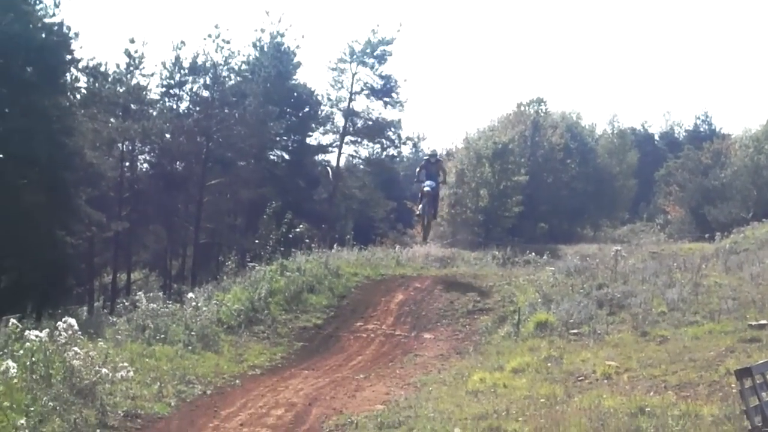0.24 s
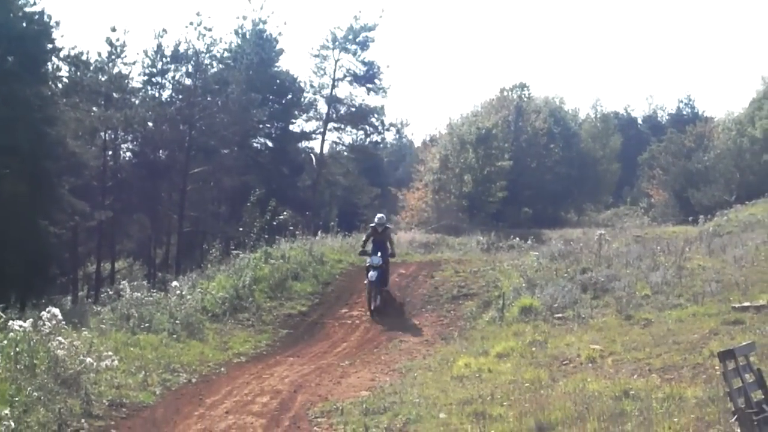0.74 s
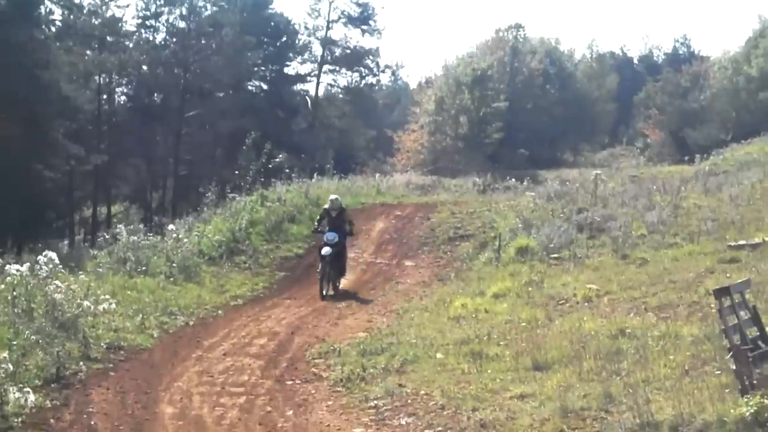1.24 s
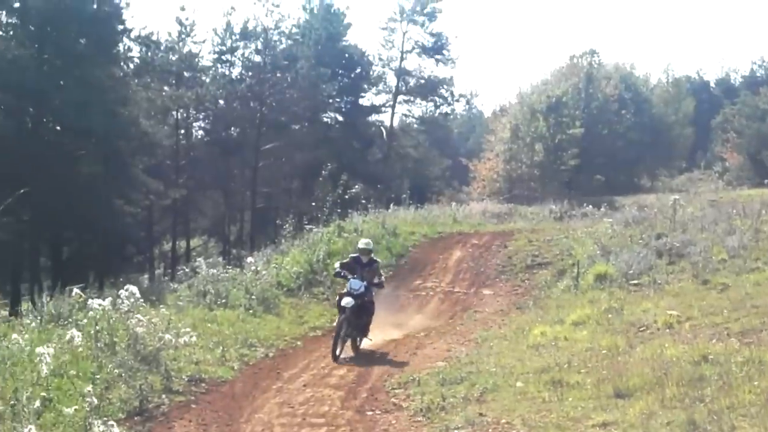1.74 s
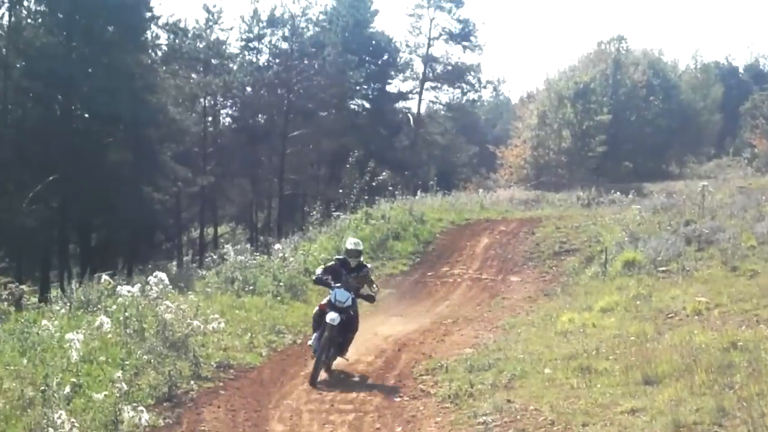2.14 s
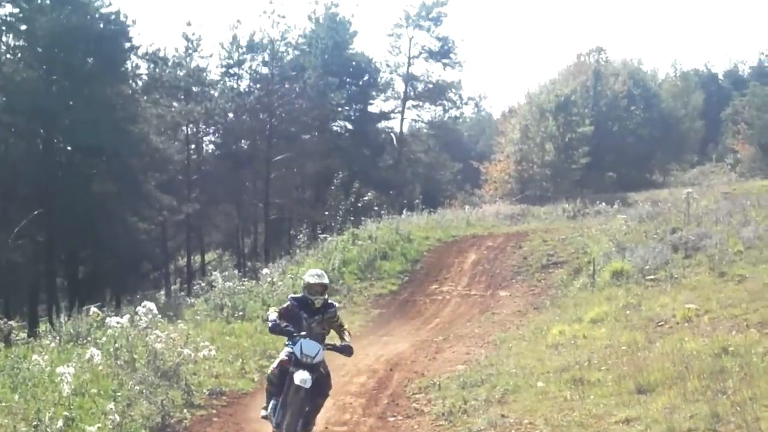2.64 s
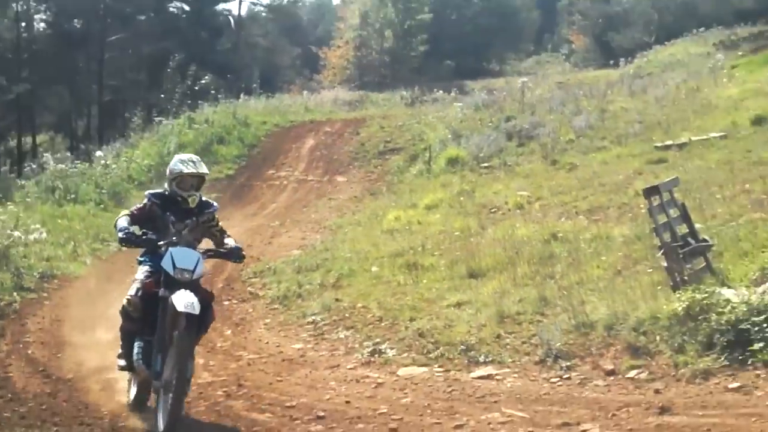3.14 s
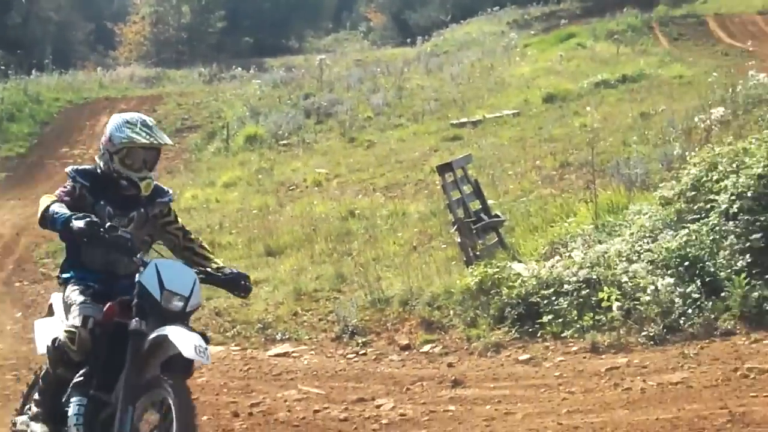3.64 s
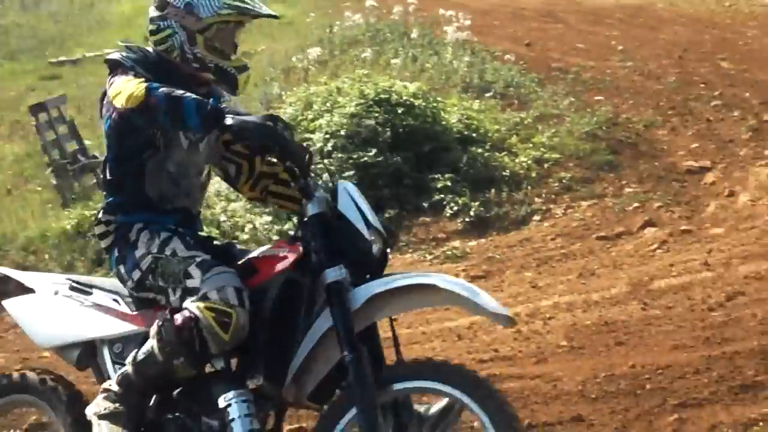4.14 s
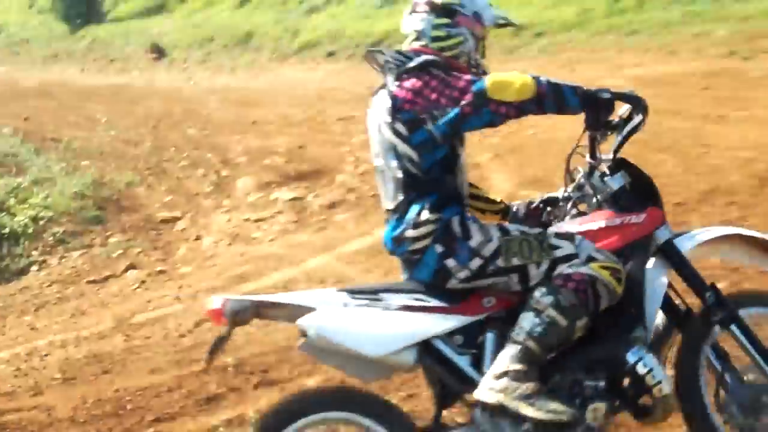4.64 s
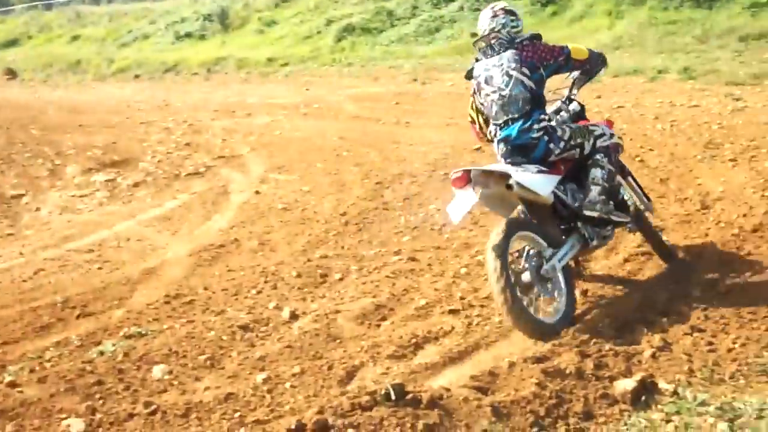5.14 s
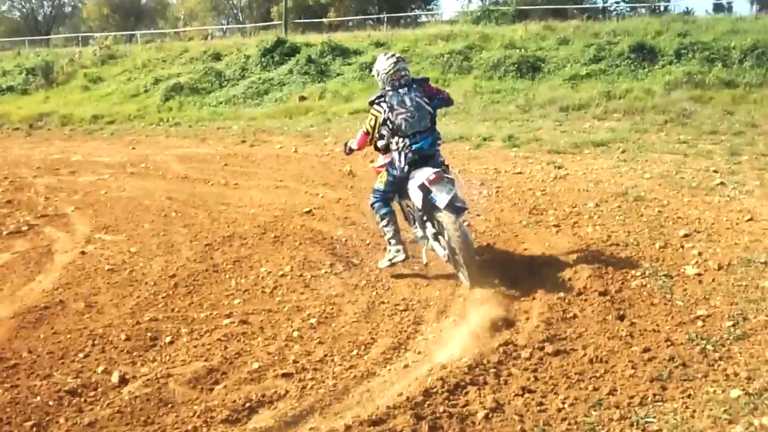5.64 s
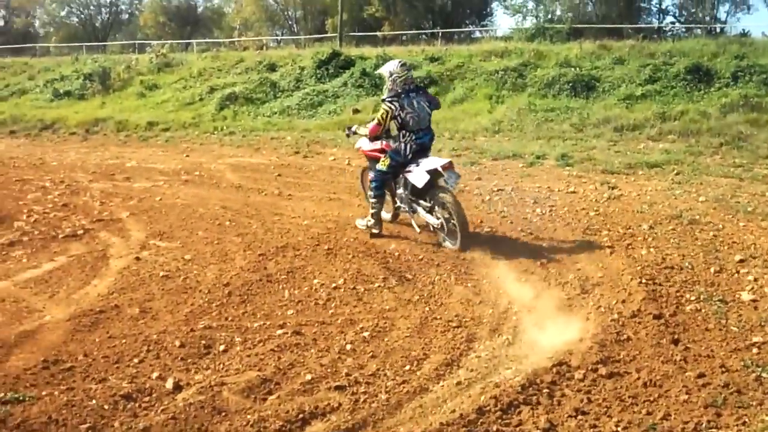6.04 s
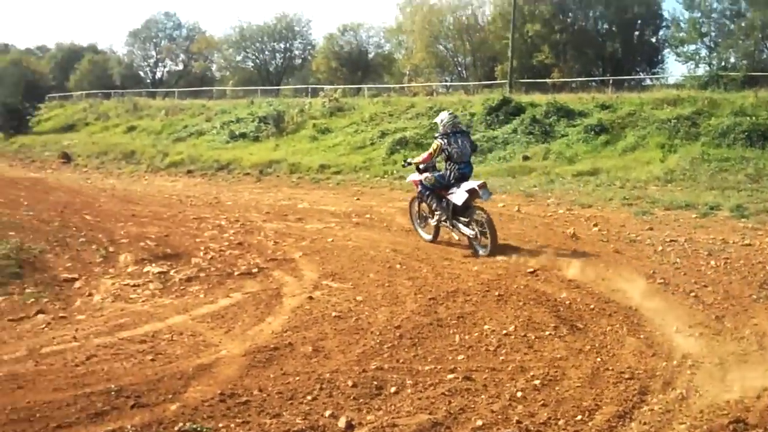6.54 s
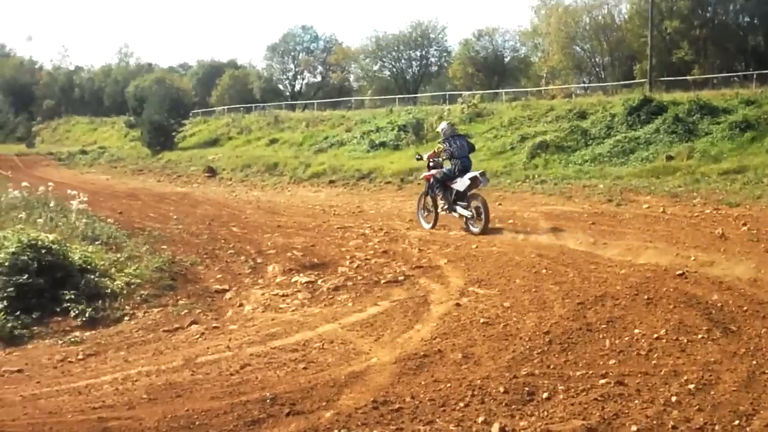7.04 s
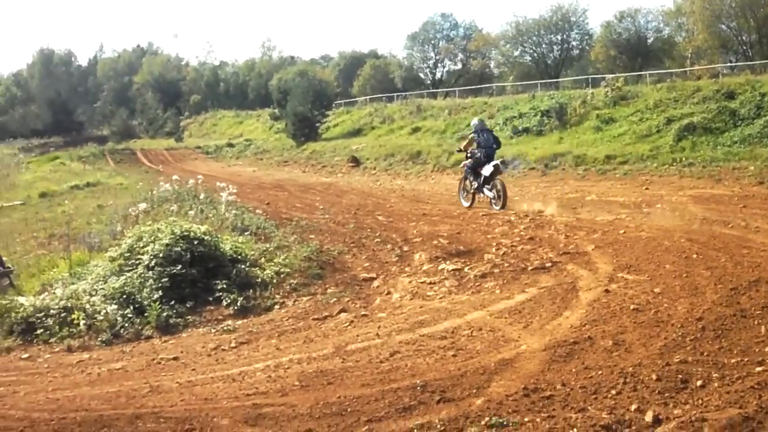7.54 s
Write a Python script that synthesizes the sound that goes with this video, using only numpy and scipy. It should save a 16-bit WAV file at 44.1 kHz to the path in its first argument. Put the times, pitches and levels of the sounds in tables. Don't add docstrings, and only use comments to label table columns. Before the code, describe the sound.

Close trackside microphone, light wind rumble. A hidden bike burbles low while a dirt bike rattles in over a jump, jolts down and buzzes sharply for a moment. The throttle closes; tyres, fins and chain whirr grow nearer. The sound cuts to dead silence, snaps back with a tiny splutter, and the two-stroke accelerates away with hard, hollow, wavering revs, a brief lift and a last popping burst.

```python
import sys
import numpy as np
from scipy import signal
from scipy.fft import rfft, irfft
from scipy.io import wavfile

SR = 44100
rng = np.random.default_rng(int(sys.argv[2]) if len(sys.argv) > 2 else 0)


def dump(signal):
    limited = np.clip(np.atleast_2d(signal).T, -1, 1)
    pcm = np.round(limited * 32767).astype(np.int16)
    wavfile.write(sys.argv[1], SR, pcm)


def gain_from_db(level_db):
    decades = np.asarray(level_db, float) / 20
    return 10 ** decades


N = 343978


def rms_one(x):
    return x / np.sqrt(np.mean(x ** 2) + 1e-20)


def in_time(rows):
    s, *columns = np.transpose(rows)
    return [np.interp(np.arange(N) / SR, s, column) for column in columns]


def drift(rate):
    steps = rng.standard_normal(800)
    return np.interp(np.arange(N) / SR * rate, np.arange(800), steps) * 0.923


def coloured(spectrum):
    hz, level_db = np.transpose(spectrum)
    grid = np.arange(1, N // 2 + 2) * SR / N
    shape = gain_from_db(np.interp(np.log(grid), np.log(hz), level_db, left=-90, right=-90))
    return rms_one(irfft(rfft(rng.standard_normal(N)) * shape, N))


def strikes(rows):
    clicks = np.zeros(N) + 1e-18
    clicks[[round(s * SR) for s, level_db in rows]] = gain_from_db(np.array(rows)[:, 1])
    return clicks


def late(x, lag_ms):
    return np.interp(np.arange(N) - lag_ms * SR / 1000, np.arange(N), x)


def band(x, order, band_hz):
    return signal.sosfilt(signal.butter(order, band_hz, "band", fs=SR, output="sos"), x)


def dull(x, order, cutoff_hz):
    return signal.sosfilt(signal.butter(order, cutoff_hz, fs=SR, output="sos"), x)


def pipe(x, modes):
    out = 0
    for k, (hz, width, level_db) in enumerate(modes):
        r = np.exp(-np.pi * width / SR)
        poles = [1, -2 * r * np.cos(2 * np.pi * hz / SR), r * r]
        out = out + (-1) ** k * gain_from_db(level_db) * signal.lfilter([1 - r, 0, r - 1], poles, x)
    return out


def sliding(x, hz, width_hz):
    turn = np.exp(2j * np.pi * np.cumsum(hz) / SR)
    r = np.exp(-np.pi * width_hz / SR)
    return 2 * np.real(turn * signal.lfilter([1 - r], [1, -r], x / turn))


VOICE_PATCHY_DB = 1.2


def engine(controls, voices, lag_ms):
    rate, orders_db, voices_db, spread_db = controls
    turns = np.cumsum(rate * (1 + .003 * drift(14) + .001 * spread_db * drift(40))) / SR
    cycle = turns.astype(int)
    strength = gain_from_db(np.minimum(spread_db, 2) * rng.standard_normal(1200)[cycle])
    sound = 0
    for k, level_db in enumerate(orders_db, 1):
        phase = 2 * np.pi * k * (turns - .06 - rate * lag_ms / 1000) + .3
        sound = sound + np.sqrt(2) * gain_from_db(level_db + .5 * spread_db * drift(25)) * np.sin(phase)
    gate = np.exp(-5.0 * (turns - cycle)) * strength
    pulses = np.diff(cycle, prepend=0) * strength * np.sqrt(SR / rate)
    breath = .13 * spread_db ** 2
    puffs = breath * (gate + .4) * rng.standard_normal(N)
    source = (pulses + puffs) / np.sqrt(1 + .42 * breath ** 2)
    for level_db, (resonate, band_hz, lift_db, roar) in zip(voices_db, voices):
        ringing = band(resonate(source + roar * rng.standard_normal(N)), 3, band_hz)
        sound = sound + gain_from_db(level_db + lift_db + VOICE_PATCHY_DB * drift(11)) * rms_one(ringing)
    return sound, gate, turns


# start_s, level_db over the mean
GUSTS = [(0, -10), (1.7, 3.5), (2.2, -1), (5.6, 3), (6.1, 0), (7.8, 0.5)]
WIND_DB = -47.5


def wind():
    rumble = coloured([(12, -5.5), (28, -21.0), (70, -10.0), (120, -11.0)])
    return gain_from_db(WIND_DB + in_time(GUSTS)[0] + 4.5 * drift(30)) * rumble


# start_s, firings_per_s
HIDDEN_REVS = [(0, 42.6), (.5, 43.8), (.62, 48), (.69, 47), (.78, 50.5), (.99, 55.9), (1.05, 52.9),
               (1.39, 51), (1.67, 54.7), (1.77, 58.8), (1.84, 65.7), (1.93, 53.2), (2.05, 73.9),
               (2.26, 52.2), (2.33, 50.5), (3.1, 47.1), (3.4, 46), (3.75, 48.9), (4.18, 53.1), (4.3, 50.4),
               (4.56, 54.6)]
# start_s, level_db
HIDDEN_EFFORT = [(0, -4), (.5, 1.5), (.99, 10), (1.16, 10.5), (1.22, -7), (1.67, 6), (1.84, 12),
                 (1.93, -1.5), (1.97, 12), (2.05, 16.5), (2.17, 4), (2.33, -2), (3.1, -1.5), (3.4, 6),
                 (4.05, -7), (4.18, 1), (4.3, -16), (4.56, 9)]
# start_s, spread_db
HIDDEN_ROUGH = [(0, .35), (.5, .4), (.6, 1), (.93, 1.6), (1.1, 2.2), (2.3, 1.5), (4.56, 3)]
# idle_db, share_of_effort, overrun_lift_db
HIDDEN_ORDERS = [(-49.5, 0.82, 0.5), (-45, 0.94, 5.5), (-58.5, 0.065, 20.5), (-45.5, 0.33, -14),
                 (-43.5, 0.13, -6), (-50, 0.19, -17), (-64, 0.264, -20), (-69, 0.41, -10), (-53, .1, -8),
                 (-54.5, .1, -4)]
# idle_db, share_of_effort, overrun_lift_db
HIDDEN_VOICES = [
    (-46.5, 0.51, 1),
    (-59.5, 1, -1.3),
]
# start_s, end_s
OVERRUN_S = (2.164, 3.31)
OVERRUN_EASE_S = 0.28
LEAVES_S, LEAVING_DB_PER_S = 3.0, -28
HIDDEN_CRACK_S, HIDDEN_MUFFLED_DB = .565, -7


def hidden_controls():
    t = np.arange(N) / SR
    (effort_db,) = in_time(HIDDEN_EFFORT)
    inside_s = np.minimum(t - OVERRUN_S[0], OVERRUN_S[1] - t)
    overrun = np.clip(inside_s / OVERRUN_EASE_S + 1, 0, 1)
    *orders_db, pipe_db, tail_db = [idle_db + share * effort_db + lift_db * overrun
                                    for idle_db, share, lift_db in HIDDEN_ORDERS + HIDDEN_VOICES]
    leaving_db = LEAVING_DB_PER_S * np.maximum(t - LEAVES_S, 0)
    orders_db[3:] = [level_db + leaving_db for level_db in orders_db[3:]]
    tail_db = tail_db + HIDDEN_MUFFLED_DB * (t < HIDDEN_CRACK_S)
    return in_time(HIDDEN_REVS)[0], orders_db, [pipe_db + leaving_db, tail_db], in_time(HIDDEN_ROUGH)[0]


# teeth_per_turn, level_db
GEAR_MESH = [(27, -58), (42, -61), (44, -57)]


def gear_whine(turns):
    loaded = np.interp(np.arange(N) / SR, [2.2, 2.5, 3.0, 3.15], [0, 1, 1, 0])
    return loaded * sum(gain_from_db(level_db + 3 * drift(12)) * np.sin(2 * np.pi * teeth * turns)
                        for teeth, level_db in GEAR_MESH)


# start_s, level_db
CRACKS = [(.5987, -27.5), (.6192, -31.5), (.681, -31), (.7663, -30), (.901, -29), (.9893, -33),
          (1.0667, -31), (1.1031, -29.5), (1.1205, -28), (1.155, -28), (1.173, -28.5), (1.9677, -30),
          (1.9841, -30), (1.9996, -27), (2.0141, -27), (2.0415, -25), (2.0674, -25)]
# pitch_hz, width_hz, level_db
CRACK_RING = [(1750, 200, 5), (2470, 350, -0.5), (3300, 500, -3)]


def hidden_cracks():
    return gain_from_db(17) * pipe(strikes(CRACKS), CRACK_RING)


# pitch_hz, width_hz, level_db
HIDDEN_PIPE = [(204.4, 17, 12.5), (276, 25, 2), (430, 83, -7.5), (606, 510, -34)]
# pitch_hz, width_hz, level_db
HIDDEN_TAIL = [(1150, 200, -4), (1750, 170, 3), (2500, 300, -4), (3600, 600, -11)]


def hidden_bike():
    # resonances, band Hz, lift dB, share of steady gas roar
    voices = [(lambda x: pipe(x, HIDDEN_PIPE), [150, 900], 0, .04),
              (lambda x: pipe(x, HIDDEN_TAIL), [950, 4500], 4, .2)]
    sound, gate, turns = engine(hidden_controls(), voices, 0)
    heard = np.arange(N) < DROPOUT_S[1] * SR
    return sound * heard + gear_whine(turns) + hidden_cracks(), gate


# start_s, shut_s, first_load (0-1), last_load (0-1)
THROTTLE = [
    (1.063, 1.081, 0.5, 0.01),
    (1.239, 1.822, 0.7, 0.73),
    (1.896, 2.925, 0.04, 0.01),
    (2.99, 3.507, 0.19, 0.17),
    (5.075, 5.404, 0.68, 0.73),
    (5.355, 5.721, 0.74, 0.85),
    (5.704, 6.474, 0.87, 0.97),
    (6.382, 7.056, 0.92, 0.94),
    (7.291, 7.916, 0.91, 0.83),
]
OPEN_S, SHUT_S = 0.045, 0.058
# start_s, length_s
MISFIRES = [(1.26, 0.0079), (7.348, 0.036), (7.398, 0.0072), (7.408, 0.0074), (7.523, 0.022),
            (7.604, 0.042)]
MISFIRE_DEPTH = 0.36


def throttle():
    t = np.arange(N) / SR
    openings = [np.interp(t, [s - 1e-9, s + OPEN_S, end, end + SHUT_S], [0, first, last, 0])
                for s, end, first, last in THROTTLE]
    missed = np.max([np.exp(-((t - s) / length) ** 2) for s, length in MISFIRES], axis=0)
    return np.max(openings, axis=0) * (1 - MISFIRE_DEPTH * missed)


# start_s, nearness_db, tailpipe_aim_db
PASS = [(0, -2.5, 4), (1.2, -1, 3.5), (1.85, 4, 9.5), (2.3, 1.5, 2), (3.3, 4, 0), (4.1, 6.5, 12.5),
        (4.35, 9.5, 15.5), (4.55, 9.5, 11.5), (5.14, 7.5, 3.5), (5.38, -0.5, 4.5), (5.48, -0.4, 17),
        (5.66, -0.4, 15), (5.92, 2.3, 10.5), (6.2, 3, 3), (6.5, 4.5, -0.5), (6.7, 5.5, 1.5), (7.2, 2.5, -1),
        (7.8, 5.5, 3)]


def near_levels(layers):
    load = throttle()
    near_db, aim_db = in_time(PASS)
    return [shut_db + (open_db - shut_db) * load + by_near * near_db + by_aim * aim_db
            for shut_db, open_db, by_near, by_aim in layers]


# start_s, level_db
JOLTS = [(0.989, 8), (1.059, 7), (1.085, 5.5), (1.244, 7.5), (1.278, 7), (2.0, -4), (3.429, 1),
         (3.823, 6.5), (5.15, -2.5), (5.4, 5)]
JOLT_S = 0.044


def jolts():
    t = np.arange(N) / SR
    return sum(level_db * (t > s) * np.exp(-np.abs(t - s) / JOLT_S) for s, level_db in JOLTS)


# pitch_hz, level_db
TYRES = [(15, -66.5), (25, -31.5), (101, -16.5), (146, -0.5), (200, -6), (393, -13.5), (431, -55),
         (465, -14.5), (768, -11.5), (950, -12), (1240, -8), (2090, -120)]
AIRBORNE_S, AIRBORNE_DB = .92, -5
TYRE_LUMPS_DB = 1.8


def tyres(rolling_db):
    airborne = np.clip((AIRBORNE_S - np.arange(N) / SR) / 0.3, 0, 1)
    return gain_from_db(rolling_db + AIRBORNE_DB * airborne + TYRE_LUMPS_DB * drift(18)) * coloured(TYRES)


# start_s, level_db
TICKS = [(2.939, -23.5), (3.83, -22.5), (3.872, -22)]


def stones():
    return gain_from_db(19.0) * pipe(strikes(TICKS), [(2420, 500, -3.5), (3980, 460, 2), (6000, 2000, -20.5)])


# shut_db, open_db, share_of_nearness, share_of_aim
GEAR = [
    (-53, -49, 1, .01),
    (-55.5, -49.5, 1, 0.055),
    (-39, -36, 0.088, 0.16),
]
# pitch_hz, width_hz, level_db
CLATTER = [(1270, 87, 4), (1800, 140, 5.5), (1970, 220, 6), (2486, 182, 2), (2800, 210, -1.5),
           (3500, 550, -6.5)]
# pitch_hz, width_hz, level_db
FINS = [(3570, 910, 3), (4380, 350, 5.5), (4820, 290, 4), (5233, 100, 9.5), (5540, 640, 2.5),
        (6510, 635, 2), (6970, 540, 0), (9050, 2100, -23)]
# pitch_hz, level_db
HISS = [(4410, -37), (7500, -39), (8340, -12.5), (9420, -1.5), (10100, -0.5), (13500, -3.5), (15000, 2),
        (15800, -24.5)]
JOLT_CLATTER = 0.45
FAR_FINS_DB = -4


def running_gear(near_gate, hidden_gate):
    t, jolt_db = np.arange(N) / SR, jolts()
    clatter_db, fin_db, rolling_db = near_levels(GEAR)
    clatter_db = clatter_db + JOLT_CLATTER * jolt_db
    rolling_db = rolling_db + JOLT_CLATTER * jolt_db
    fin_db = fin_db + jolt_db + FAR_FINS_DB * np.clip((AIRBORNE_S - t) / 0.1, 0, 1)
    hidden_share = np.interp(t, [1.2, 1.3, 1.85, 1.95, 2.15, 2.3], [1, .2, .2, 1, 1, .15])
    throb = hidden_share * 1.1 * hidden_gate + (1 - hidden_share) * near_gate
    flicker = gain_from_db(1.3 * drift(40) + 0.66 * drift(110))
    shake = rng.standard_normal((2, N)) * (1 + 0.66 * throb) * flicker
    clatter = gain_from_db(clatter_db) * rms_one(band(pipe(shake[0], CLATTER), 2, [1650, 3800]))
    fins = gain_from_db(fin_db) * rms_one(band(pipe(shake[1], FINS), 3, [3300, 8800]))
    hiss = gain_from_db(0.75 * fin_db - 27.5) * rms_one(coloured(HISS) * (1 + .6 * throb))
    return tyres(rolling_db) + clatter + fins + hiss + stones()


# start_s, end_s, from_hz, to_hz, level_db
WHIRRS = [(0, 0.296, 787, 714, -52), (0, .28, 850, 802, -50), (1.3, 1.87, 5260, 5220, -58),
          (1.38, 1.58, 3680, 3770, -55), (1.53, 1.86, 2480, 2480, -58), (.3, .62, 1120, 1100, -70),
          (.55, .9, 1140, 1070, -49), (2.195, 2.6, 1320, 1250, -60), (2.55, 2.895, 1400, 1270, -53),
          (2.297, 2.754, 764, 690, -55), (3.296, 3.7, 1300, 1160, -47), (3.397, 3.8, 1096, 982, -55),
          (2.42, 2.852, 2174, 2040, -54.5), (2.897, 3.1, 2014, 2170, -53), (3.006, 3.382, 551, 519, -44.5),
          (3.1, 3.595, 808, 735, -45.5), (3.2, 3.596, 2590, 2350, -57), (3.196, 3.45, 2420, 2300, -55),
          (3.317, 3.748, 2160, 1950, -50.5), (3.35, 4.0, 800, 850, -50), (3.8, 4.103, 2050, 2000, -49.5),
          (4.18, 4.45, 830, 730, -46), (3.1, 3.3, 1770, 1730, -55), (3.55, 3.82, 1730, 1620, -55),
          (1.25, 1.5, 2420, 2450, -58), (3.45, 3.8, 2200, 2060, -56), (2.3, 2.7, 600, 540, -52),
          (7.262, 7.375, 290, 240, -31), (6.596, 6.702, 680, 712, -30), (7.366, 7.43, 1070, 1050, -38),
          (3.9, 4.6, 445, 404, -46)]
# start_s, end_s, from_hz, to_hz, level_db
ROARS = [(4.08, 4.6, 840, 710, -37.5), (4.22, 4.6, 2000, 2220, -40), (3.9, 4.6, 2200, 2350, -48),
         (4.36, 4.6, 2300, 2800, -44.5), (4.3, 6.9, 1350, 1170, -42.5), (6.76, 7.12, 8700, 8800, -61),
         (1.38, 1.86, 7000, 6300, -56), (6.75, 7.15, 3000, 3050, -53), (7.3, 7.8, 3070, 3080, -53.5),
         (6.7, 11, 8700, 8800, -73)]
WHIRR_SHARPNESS, ROAR_SHARPNESS = 55, 9
WHIRR_TONE = 1.2
WHIRR_FADE = .2


def whirrs(rows, sharpness, tone_share):
    out, noise = np.zeros(N), rng.standard_normal(N)
    for start, end, from_hz, to_hz, level_db in rows:
        part = slice(int(max(start, 0) * SR), int(end * SR))
        along = np.linspace(0, 1, len(noise[part]))
        hz, width = from_hz + (to_hz - from_hz) * along, from_hz / sharpness
        tone = tone_share * np.sqrt(2) * np.sin(2 * np.pi * np.cumsum(hz) / SR)
        rough = rms_one(sliding(sliding(noise[part], hz, width), hz, width))
        fade = np.clip(np.minimum(along, 1 - along) / WHIRR_FADE, 0, 1)
        out[part] += gain_from_db(level_db) * fade * rms_one(tone + rough)
    return out


# pitch_hz, width_hz, level_db
NEAR_PIPE = [(299.5, 290, -23), (459.6, 36, -6), (519, 150, 0.5), (679.5, 262, 3), (777, 63, 6)]


def bark(x):
    return -pipe(x, NEAR_PIPE)


# start_s, level_db
POPS = [(.955, -37), (1.061, -34), (1.082, -25), (1.094, -29), (1.159, -36), (1.248, -27), (2.945, -42),
        (3.092, -39), (3.83, -41), (5.165, -30), (7.322, -21), (7.333, -20), (7.368, -20), (7.38, -24),
        (7.402, -21)]


def backfires():
    soft = dull(strikes(POPS), 4, 1700)
    return gain_from_db(39.5) * pipe(soft, [(214, 40, 13.0)] + NEAR_PIPE + [(1060, 160, -6), (1600, 400, -10)])


# start_s, lag_ms, share_of_ring, rasp_lag_ms
RETURN = [(1.2, 5.3, .3, 3.8), (1.9, 5.3, .3, 3.8), (5.13, 10.5, .75, 0), (5.5, 9, .75, 0),
          (5.65, 10, .6, 0), (5.9, 6, .3, 0), (6.2, 9, .65, 0), (6.6, 6.4, .65, 0), (7.0, 5.5, .55, 0),
          (7.35, 5.3, .25, 4), (7.8, 5.3, .3, 2)]


def returning(x):
    lag_ms, share, _ = in_time(RETURN)
    return (1 - share) * x + share * late(x, lag_ms)


# pitch_hz, width_hz, level_db
NEAR_RASP = [(1106, 80, 42), (1230, 253, -12), (1040, 60, 24.5), (1157, 67, 31.5)]


def rasp(x):
    return pipe(late(x, in_time(RETURN)[-1]), NEAR_RASP)


# start_s, pitch_hz, rasp_lift_db
TAIL_RING = [(0, 1724, 9.5), (1.3, 1710, 1), (1.85, 1800, -1.5), (2.8, 1800, -10), (4.5, 1611, 4.5),
             (5.13, 1700, 3.5), (5.4, 1784, 3.5), (5.5, 1590, -0.5), (5.7, 1662, -4.5), (6.0, 1650, -2.5),
             (6.2, 1750, -4.5), (6.3, 1790, -3), (6.6, 1805, -3.5), (6.72, 1546, -5.5), (7.05, 1637, 1.5),
             (7.4, 1640, -11), (7.45, 1710, -16), (7.65, 1648, -2.5), (7.75, 1744, -2.5)]
TAIL_RING_WIDTH_HZ = 187
# pitch_hz, width_hz, level_db
NEAR_TAIL = [(1930, 25, -9.5)]


def tailpipe(x):
    x = returning(x)
    hz = in_time(TAIL_RING)[0]
    once = sliding(x, hz, TAIL_RING_WIDTH_HZ)
    return sliding(once, hz, TAIL_RING_WIDTH_HZ) - pipe(x, NEAR_TAIL)


# start_s, pitch_hz, level_db
SNARL = [(0, 1253, -2), (4.1, 1350, 2), (4.55, 1258, 3), (5.2, 1340, -1), (5.55, 1326, -5),
         (5.75, 1327, 7.5), (5.95, 1350, -8), (6.1, 1286, -9), (6.4, 1290, -3.5), (6.55, 1340, -8.5),
         (6.75, 1434, -1.5), (7.0, 1560, 4), (7.4, 1457, -8.5), (7.8, 1444, -6.5)]
SNARL_WIDTH_HZ = 170


def snarl(x):
    hz, level_db = in_time(SNARL)
    return gain_from_db(level_db) * sliding(returning(x), hz, SNARL_WIDTH_HZ)


# pitch_hz, width_hz, level_db
NEAR_DRONE = [(435, 40, 0)]


def drone(x):
    return pipe(x, NEAR_DRONE)


# start_s, firings_per_s
NEAR_REVS = [(0, 111), (1.05, 80), (1.2, 101), (1.35, 101.6), (1.64, 110.1), (1.82, 111.2), (1.99, 100.3),
             (2.94, 97), (3.46, 99.1), (3.77, 78.1), (5.2, 58.5), (5.37, 61.5), (5.81, 84.7), (5.89, 78),
             (6.4, 79.3), (6.57, 92.3), (6.9, 96.9), (7.31, 85.6)]
# peak_s, extra_firings_per_s, rise_s, fall_s
WHEELSPIN = [(1.29, 6, .09, .06), (2.16, 6.7, .17, .2), (2.5, 4.3, .08, .4), (3.06, 5, .08, .15),
             (3.21, 13, .25, .25), (4.02, 3.5, .25, .15), (5.71, 8, .34, .1), (6.25, 8, .12, .15),
             (6.52, 5.3, .12, .05), (6.65, 10.7, .08, .07), (6.76, 7, .07, .14), (7.08, 21, .18, .23),
             (7.48, 7, .14, .04), (7.57, 6, .05, .06), (7.72, 27.5, .09, .18)]
# start_s, extra_firings_per_s
RUTS = [(1.36, -1.9), (1.42, 0.9), (1.49, 1.5), (1.54, -1.5), (1.59, 1.4), (1.65, -1.2), (5.21, -1.2),
        (5.28, 1.4), (5.34, -1.4), (5.45, 2.1), (5.62, -1.4), (5.69, 1.4), (5.75, -1.0), (5.8, 1.0),
        (5.87, -1.1), (5.95, 1.0), (6.02, -1.4), (6.09, 1.5), (6.15, -1.9), (6.44, -1.2), (6.5, 1.1),
        (6.55, -1.1), (6.63, 1.2), (6.77, 1.6), (6.83, -1.9), (6.89, 0.9), (6.94, -1.0), (7.04, -1.8),
        (7.47, 1.0), (7.52, -2.0), (7.56, 0.9), (7.61, -1.7), (7.66, 1.1), (7.75, 1.3)]
RUT_S, RUT_GAIN = .032, 1.4


def near_revs():
    t = np.arange(N) / SR
    rate = in_time(NEAR_REVS)[0]
    for s, extra, rise, fall in WHEELSPIN:
        rate = rate + np.interp(t, [s - rise, s, s + fall], [0, extra, 0])
    coarse = t[::64]
    ruts = sum(extra * np.exp(-((coarse - s) / RUT_S) ** 2) for s, extra in RUTS)
    return rate + RUT_GAIN * np.interp(t, coarse, ruts)


# shut_db, open_db, share_of_nearness, share_of_aim
NEAR_ORDERS = [
    (-44, -35.5, 0.07, 0.03),
    (-43, -19.5, .01, .01),
    (-66, -23.5, 0.12, .05),
    (-66.5, -31.5, 0.53, 0.18),
]
# shut_db, open_db, share_of_nearness, share_of_aim
NEAR_VOICES = [
    (-58.5, -28, 0.25, 1),
    (-62, -33.5, 0.86, 0.68),
    (-62, -53, 1, 0.51),
    (-51.5, -44, 0.93, 0.16),
    (-59, -36.5, 0.62, 0.021),
]
# pitch_hz, level_db
CHAMBER = [(60, -5), (100, -4), (150, -1.5), (200, 4.5), (240, 0.75), (310, 2), (420, -3.5)]
# start_s, ring_db, first_order_db
TAIL_FACING = [(4.5, -0.5, 0), (5.14, -7, -4), (5.3, -4.5, -1), (5.45, -4.5, 1), (5.6, -2, 7.5),
               (5.9, -2, 5.5), (6.0, -0.5, -3), (6.3, -3.5, -0.5), (6.6, -1, 1.5), (6.9, 6, 3.5),
               (7.05, 4, -2), (7.45, 0.5, 2), (7.7, 2, -1), (7.8, -1, -4)]
CREST_S, HILL_DB = 1.15, -30
TAIL_AWAY_DB = 11.5
ROUGH_OPEN_DB, ROUGH_SHUT_DB, SMOOTHING_LOAD = .8, 2.9, .3
DRONE_DB_PER_REV, DRONE_REVS = -0.17, 107


def near_controls():
    t, load, rate = np.arange(N) / SR, throttle(), near_revs()
    ring_db, first_order_db = in_time(TAIL_FACING)
    hz, gain_db = np.transpose(CHAMBER)
    hill_db = HILL_DB * np.clip((CREST_S - t) / OPEN_S, 0, 1)
    orders_db = [level_db + hill_db + np.interp(np.log(k * rate), np.log(hz), gain_db)
                 for k, level_db in enumerate(near_levels(NEAR_ORDERS), 1)]
    orders_db[0] = orders_db[0] + first_order_db
    orders_db[-1] = orders_db[-1] + in_time(HOLLOW)[-1]
    bark_db, rasp_db, tail_db, snarl_db, drone_db = near_levels(NEAR_VOICES)
    away_db = TAIL_AWAY_DB * load * (t > DROPOUT_S[0])
    rasp_db = rasp_db + in_time(TAIL_RING)[-1]
    tail_db = tail_db + ring_db + away_db
    drone_db = drone_db + DRONE_DB_PER_REV * np.minimum(rate - DRONE_REVS, 0)
    spread_db = ROUGH_OPEN_DB + (ROUGH_SHUT_DB - ROUGH_OPEN_DB) * np.exp(-load / SMOOTHING_LOAD)
    return rate, orders_db, [bark_db, rasp_db, tail_db, snarl_db + away_db, drone_db], spread_db


# start_s, pitch_hz, depth (0-1), fourth_order_lift_db
HOLLOW = [(1.2, 505, 0, 11.5), (1.45, 543, 0.56, 7), (1.85, 540, 0.64, -12), (2.2, 407, 0.74, -7),
          (5.2, 324, 0.34, -8), (5.45, 370, 0.2, -2.5), (5.7, 360, 0.8, -1.5), (5.9, 390, 1, -3),
          (6.3, 430, 1, -2), (6.45, 412, 1, -4.5), (6.6, 503, .1, -8), (6.9, 510, 0, 1.5),
          (7.0, 540, 1, -2.5), (7.3, 285, 0.9, 7), (7.45, 276, 0.6, 3.5), (7.58, 280, 0, 9.5),
          (7.64, 427, 0.1, 8), (7.8, 549, 0.6, 4)]
HOLLOW_WIDTH_HZ = 55
# start_s, share_added
BELLY = [(1.2, 0.42), (1.85, -0.2), (5.2, -0.74), (5.45, -0.22), (5.65, -0.97), (5.95, -0.027),
         (6.25, -0.7), (6.52, 0.12), (6.6, 1), (6.75, 0.82), (6.9, 0.43), (7.03, 0.95), (7.3, 1), (7.5, 1),
         (7.7, 0.34), (7.8, 0.34)]
BELLY_HZ, BELLY_WIDTH_HZ = 604, 69
GAP_HZ, GAP_WIDTH_HZ, GAP_DEPTH = 930, 110, .6


def hollow(x):
    hz, depth, _ = in_time(HOLLOW)
    x = x - np.clip(depth, 0, 1) * sliding(x, hz, HOLLOW_WIDTH_HZ)
    x = x + in_time(BELLY)[0] * pipe(x, [(BELLY_HZ, BELLY_WIDTH_HZ, 0)])
    return x - GAP_DEPTH * pipe(x, [(GAP_HZ, GAP_WIDTH_HZ, 0)])


# start_s, lag_ms
ORDER_LAG = [(0, 9.3), (5.13, 5.5), (5.95, 5), (6.6, 10.3), (7.05, 9.6), (7.4, 10), (7.8, 8.6)]
COAST_ROAR_DB = 9


def near_bike():
    roar = gain_from_db(COAST_ROAR_DB * (1 - throttle()) ** 2)
    # resonances, band Hz, lift dB, share of steady gas roar
    voices = [(bark, [420, 900], 2, .1 * roar), (rasp, [880, 1350], 3, .12 * roar),
              (tailpipe, [1400, 2100], 4, .26 * roar), (snarl, [1150, 1600], 0, .18 * roar),
              (drone, [410, 490], 0, .05)]
    sound, gate, _ = engine(near_controls(), voices, in_time(ORDER_LAG)[0])
    return hollow(sound) + backfires(), gate


# start_s, lag_ms
BANK = [(0, 2.2), (1.1, 3.0), (2.2, 2.4), (4.55, 4.2), (5.13, 3.6), (7.8, 1.8)]
BANK_SHARE, BANK_WAVER_MS = .2, .12


def bank_echo(x):
    copy = late(x, in_time(BANK)[0] + BANK_WAVER_MS * drift(7))
    return (x + BANK_SHARE * copy) / np.sqrt(1 + BANK_SHARE ** 2)


# start_s, lag_ms
GROUND = [(0, .37), (2.5, .335), (4.55, .3), (5.13, .36), (5.75, .355), (6.2, .37), (6.5, .33), (6.9, .34),
          (7.8, .335)]
GROUND_SHARE, GROUND_WAVER_MS = .5, .012


def ground_echo(x):
    copy = late(x, in_time(GROUND)[0] + GROUND_WAVER_MS * drift(9))
    return (x + GROUND_SHARE * dull(copy, 1, 6000)) / (1 + GROUND_SHARE)


def scene():
    hidden, hidden_gate = hidden_bike()
    near, near_gate = near_bike()
    bike = wind() + running_gear(near_gate, hidden_gate) + near
    singing = whirrs(WHIRRS, WHIRR_SHARPNESS, WHIRR_TONE) + whirrs(ROARS, ROAR_SHARPNESS, 0)
    return ground_echo(hidden + singing + bank_echo(bike))[None]


def band_limit(x):
    return signal.sosfilt(signal.butter(12, 16970, fs=SR, output="sos"), x)


# start_s, end_s
DROPOUT_S = (4.555, 5.1345)
# start_s, level_db
RETURN_CLICKS = [(5.1363, -23), (5.139, -25), (5.142, -20), (5.1452, -28)]


def record(dry):
    t = np.arange(N) / SR
    splutter = sum(gain_from_db(level_db) * (t > s) * np.exp(-np.abs(t - s) / .0008) for s, level_db in RETURN_CLICKS)
    splutter = splutter + gain_from_db(-35) * (t > DROPOUT_S[1]) * (t < DROPOUT_S[1] + .014)
    splutter = dull(splutter * rng.standard_normal(N), 1, 9000)
    live = (t < DROPOUT_S[0]) | (t > DROPOUT_S[1])
    ending = np.clip((N / SR - t) / .003, 0, 1)
    return band_limit(dry * live * ending + splutter)


dry = scene()
out = record(dry)
dump(out)
```